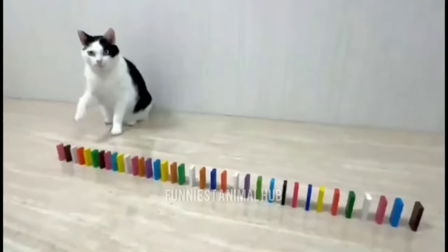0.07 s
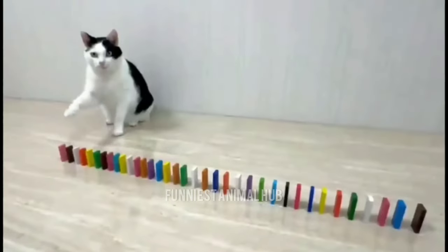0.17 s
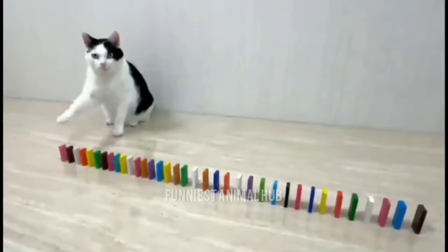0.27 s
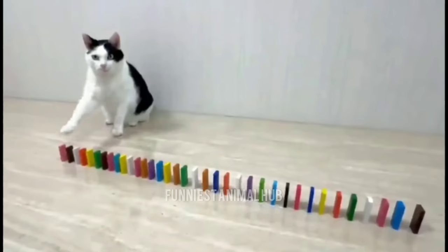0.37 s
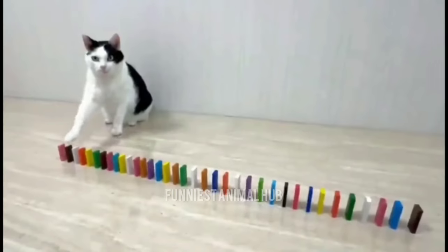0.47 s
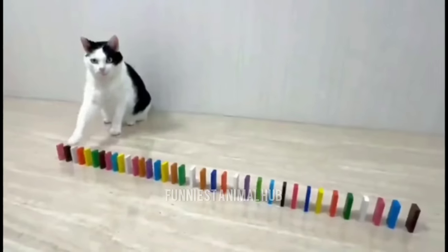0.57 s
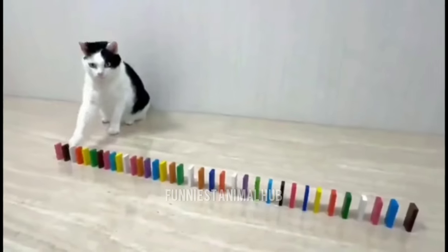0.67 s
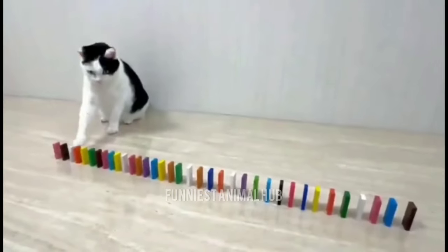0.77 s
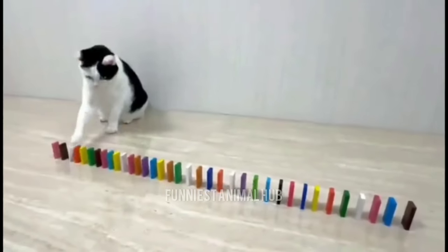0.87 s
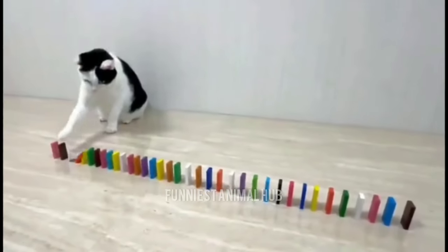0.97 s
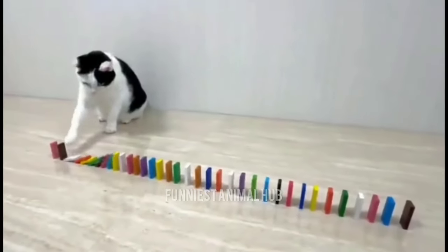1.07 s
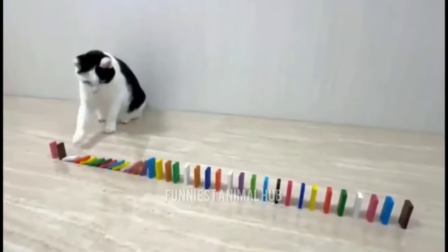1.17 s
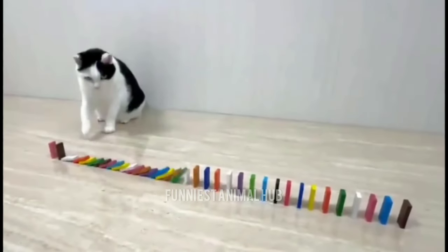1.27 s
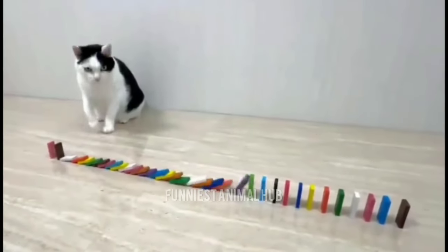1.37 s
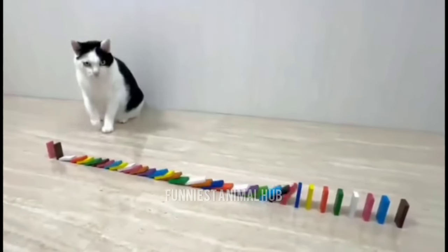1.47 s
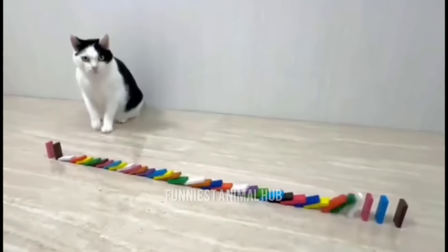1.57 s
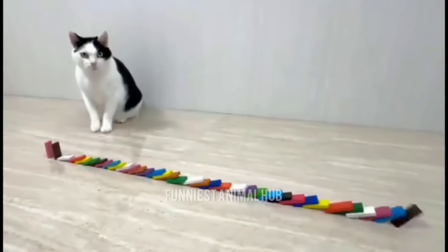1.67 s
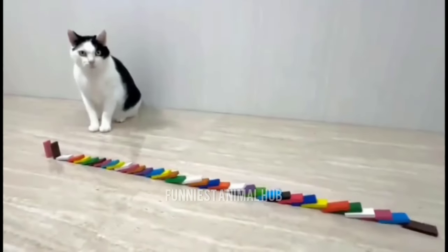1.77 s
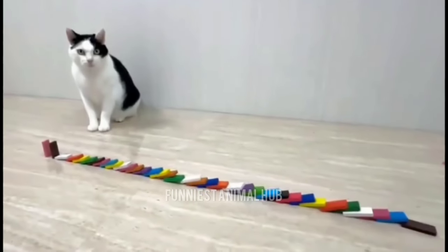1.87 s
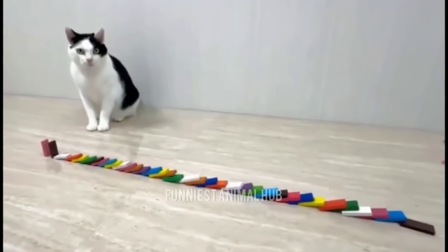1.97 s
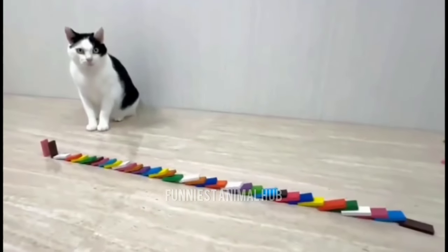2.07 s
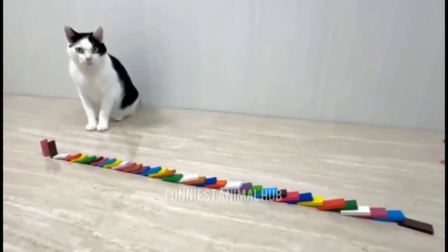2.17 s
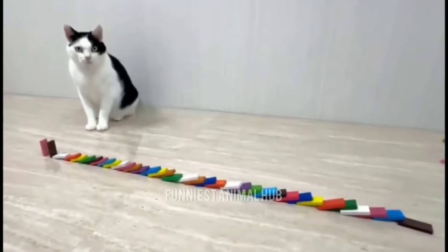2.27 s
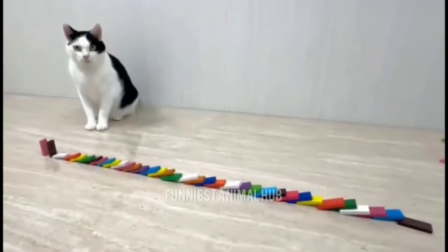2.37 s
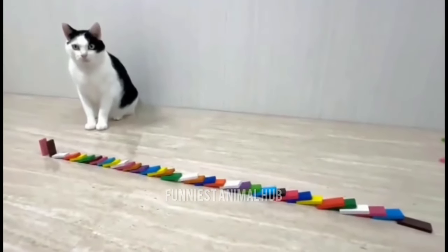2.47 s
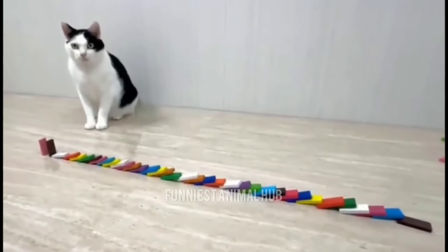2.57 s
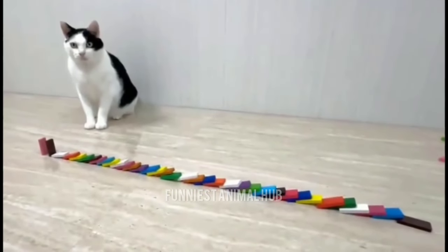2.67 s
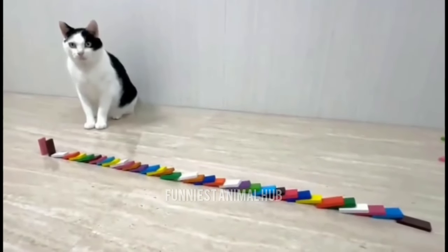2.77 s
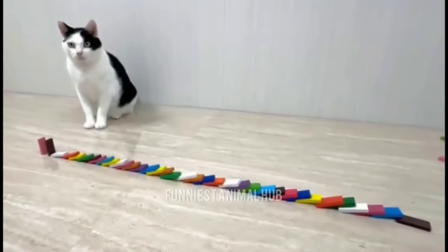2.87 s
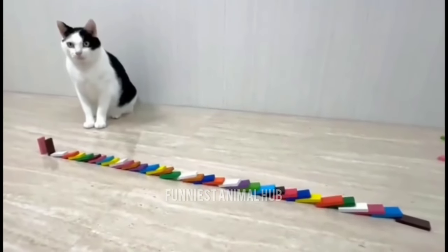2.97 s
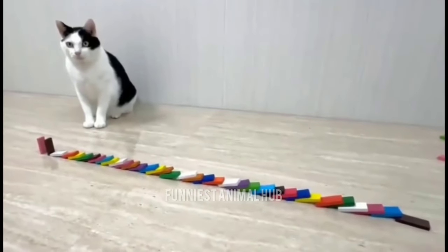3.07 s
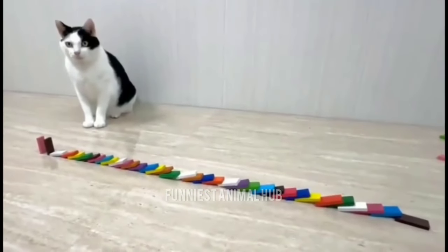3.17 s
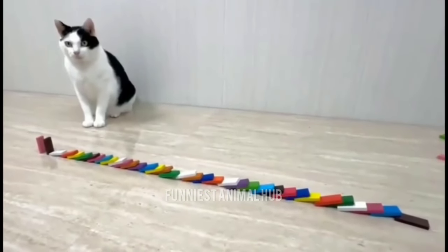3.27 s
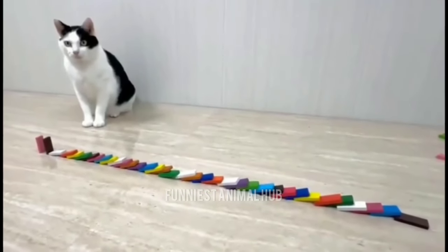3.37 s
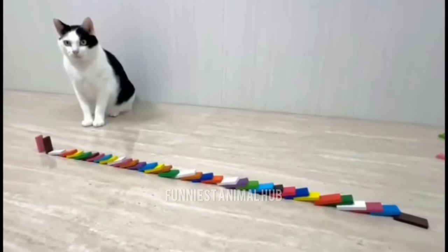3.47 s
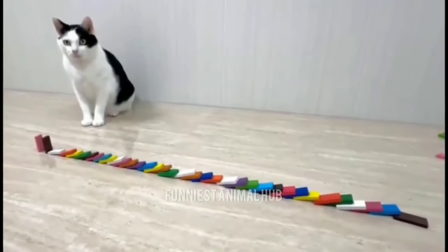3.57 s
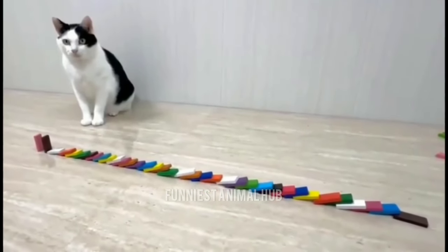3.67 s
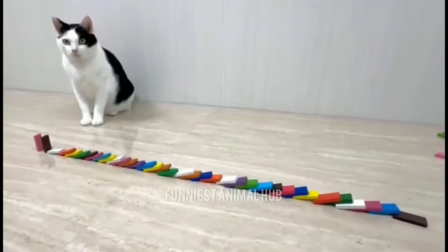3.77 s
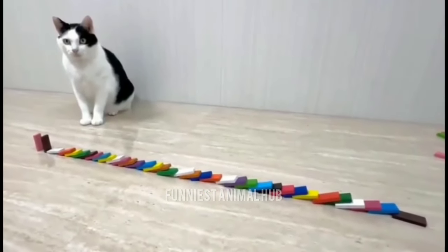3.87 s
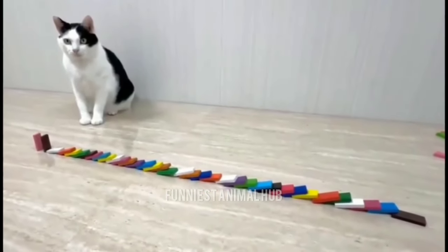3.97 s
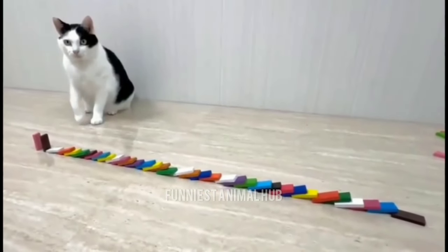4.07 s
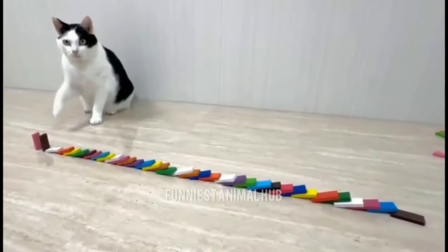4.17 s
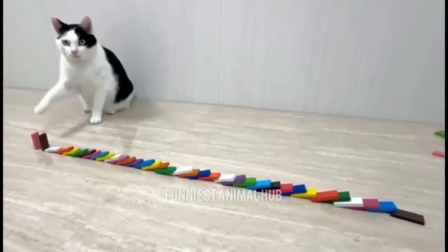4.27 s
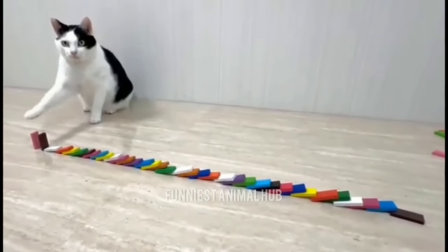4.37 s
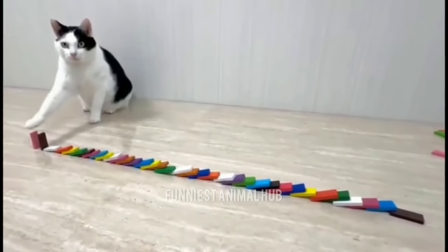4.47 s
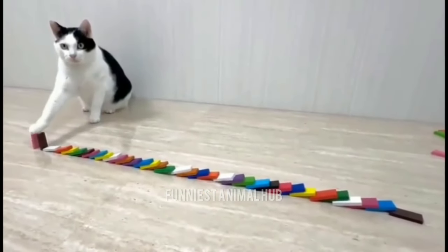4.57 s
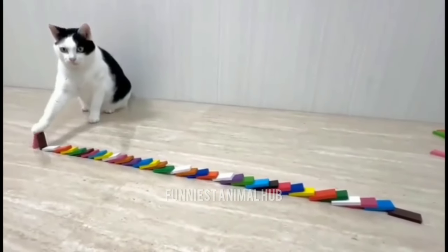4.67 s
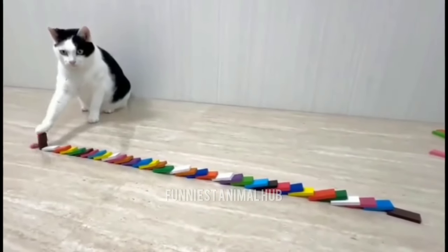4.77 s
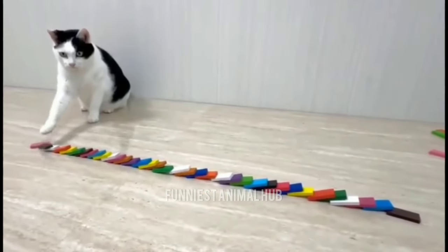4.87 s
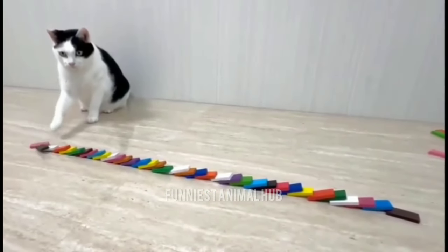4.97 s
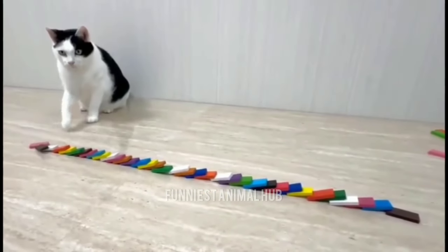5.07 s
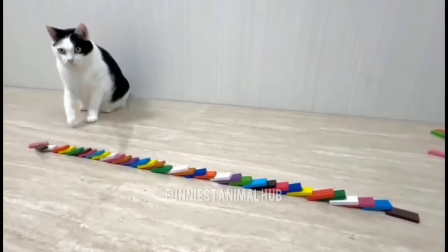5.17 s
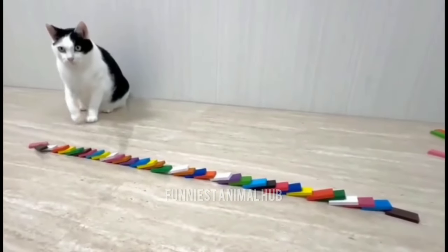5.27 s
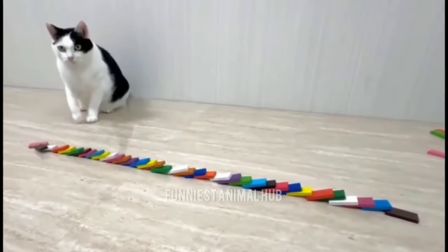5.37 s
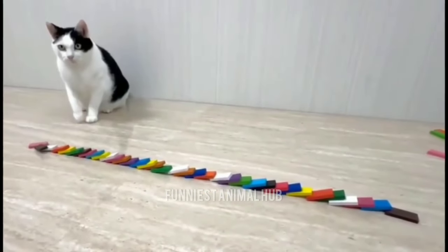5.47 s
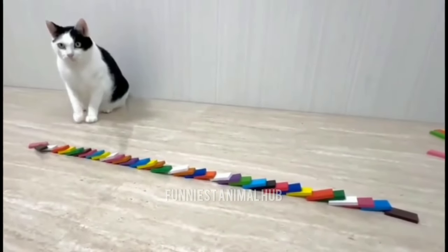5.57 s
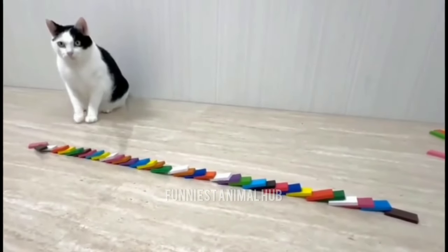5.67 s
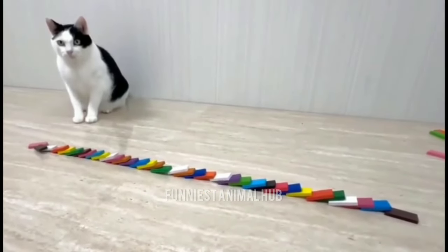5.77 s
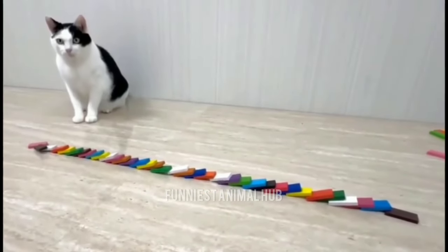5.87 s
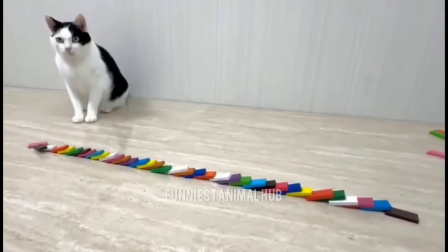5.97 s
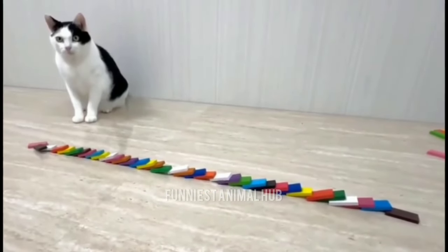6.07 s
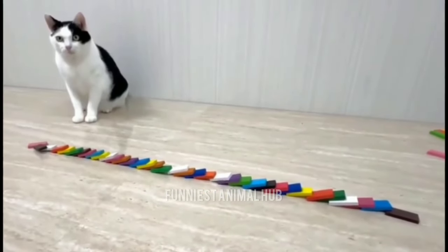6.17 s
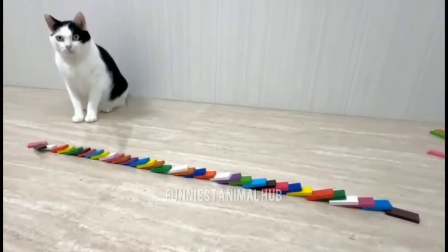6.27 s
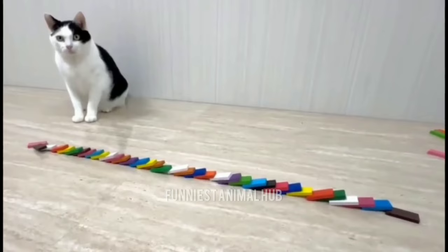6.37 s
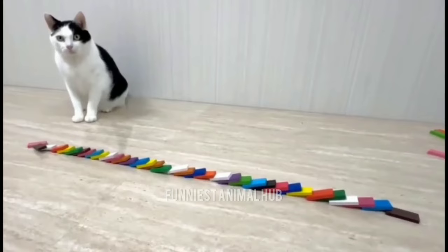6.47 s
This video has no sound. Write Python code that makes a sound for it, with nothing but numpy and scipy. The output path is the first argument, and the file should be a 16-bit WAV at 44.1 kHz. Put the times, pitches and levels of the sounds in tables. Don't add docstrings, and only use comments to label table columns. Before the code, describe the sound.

A long row of small wooden dominoes topples in a rapid clacking rush on a hard floor, then two last blocks clack over later.

```python
import sys
import numpy as np
from scipy import signal
from scipy.fft import rfft, irfft
from scipy.io import wavfile
from scipy.ndimage import uniform_filter1d

SR = 44100
rng = np.random.default_rng(int(sys.argv[2]) if len(sys.argv) > 2 else 0)


def volts_from_db(level):
    exponent = np.asarray(level, float) / 20
    return 10 ** exponent


def master_out(mix):
    frames = np.transpose(np.atleast_2d(mix))
    ceiling = np.clip(frames, -1, 1)
    pcm = np.round(ceiling * 32767).astype(np.int16)
    wavfile.write(sys.argv[1], SR, pcm)


N = 287795
PORT_LAG_S = .0002
LAST_BLOCK_S = 2.043


def along(table, hz):
    at, value = np.transpose(table)
    return np.interp(np.log(np.maximum(hz, 1)), np.log(at), value)


def unit(x):
    return x / np.sqrt(np.mean(x ** 2))


def ring(x, modes):
    out = 0
    for k, (hz, width, db) in enumerate(modes):
        b, a = signal.iirpeak(hz, hz / width, SR)
        out = out + (-1) ** k * volts_from_db(db) * signal.lfilter(b, a, x + 1e-18)
    return out


def place(seconds, grains):
    out = np.zeros(N + 1024)
    np.add.at(out, (seconds[:, None] * SR).astype(int) + np.arange(1024), grains)
    return out[:N]


def blows(seconds, db, contact_s, rise_s=0.00051):
    t = np.arange(1024) / SR
    rough = volts_from_db(db)[:, None] * rng.standard_normal((len(seconds), 1024))
    return place(seconds, rough * (1 - np.exp(-t / rise_s)) * np.exp(-t / contact_s))


def pings(seconds, db, hz, ring_s):
    t = np.arange(1024) / SR
    notes = volts_from_db(db)[:, None] * np.sin(2 * np.pi * hz[:, None] * t)
    return place(seconds, notes * (1 - np.exp(-t / 0.00058)) * np.exp(-t / ring_s))


# (frequency [Hz], width [Hz], level [dB])
BLOCK_MODES = [(1326, 233, 1), (1919, 220, 0), (2586, 412, 0), (3670, 530, 0), (4600, 350, 3),
               (5000, 1070, 1), (6800, 2100, -10)]
BLOCK_SIZES = (.9, .96, 1.03, 1.1)


def wood(push, spread=0.94):
    turn = int(.011 * SR)
    which = np.repeat(rng.integers(0, len(BLOCK_SIZES), N // turn + 1), turn)[:N]
    out = 0
    for k, scale in enumerate(BLOCK_SIZES):
        modes = [(hz * scale, width * spread, db) for hz, width, db in BLOCK_MODES]
        out = out + ring(push * (which == k), modes)
    return out


# (frequency [Hz], width [Hz], level [dB])
CORNER_MODES = [(8910, 2830, 1), (9660, 1400, 4), (11700, 2500, -2)]


def corner(push):
    return ring(push, CORNER_MODES)


# (frequency [Hz], width [Hz], level [dB])
BOARD_MODES = [(152, 39, -18), (335, 46, 2.5), (485, 77, -6.5), (663, 102, -1), (987, 260, -16.5)]


def boards(push):
    return ring(push, BOARD_MODES)


# (frequency [Hz], width [Hz], level [dB])
FLOOR_MODES = [(77.4, 13, 3), (107, 44, -18.5)]


def whole_floor(push):
    return ring(push, FLOOR_MODES)


# (time [s], level [dB], loudest block mode [Hz])
CLACKS = [(1.2112, -28, 3400), (1.2418, -31, 2100), (1.2689, -23, 2700), (1.288, -22.5, 2820),
          (1.297, -15, 2670), (1.3195, -24.5, 2800), (1.4336, -14.5, 3290), (1.5588, -16, 8040),
          (1.6566, -19, 4000), (1.7391, -18.5, 4470), (1.9242, -18, 4800), (1.9712, -21, 5500),
          (2.0404, -16, 3447), (2.1075, -29, 5370), (5.1283, -16.5, 5580), (5.1453, -35, 6140),
          (5.1864, -29, 3650), (5.2078, -15, 3710), (5.2641, -34, 4600), (5.2889, -46.5, 4780),
          (5.8423, -57.5, 6040)]
# (time [s], level [dB], loudest block mode [Hz])
KNOCKS = [(1.33, -43.5, 2470), (1.3484, -28, 4700), (1.3575, -28, 4350), (1.371, -28.5, 3400),
          (1.3872, -26.5, 4500), (1.3978, -23, 5050), (1.4071, -21.5, 2980), (1.445, -28.5, 3520),
          (1.4935, -23.5, 3320), (1.5053, -14, 2530), (1.5298, -25.5, 3600), (1.541, -24.5, 3300),
          (1.565, -41, 6800), (1.5882, -32.5, 8000), (1.61, -21, 8250), (1.6315, -16, 5600),
          (1.6405, -27, 3140), (1.69, -25.5, 4120), (1.711, -26, 6800), (1.761, -22.5, 3430),
          (1.773, -19, 3400), (1.799, -24, 2500), (1.8123, -30, 3530), (1.8255, -34.5, 6840),
          (1.8375, -32, 3330), (1.8574, -32, 3370), (1.879, -17.5, 3310), (1.8889, -31, 2970),
          (1.9008, -23, 6140), (1.949, -23, 5640), (1.9942, -38.5, 5500), (2.008, -21, 3700),
          (2.0742, -30, 5070), (2.0855, -23, 2780), (2.0982, -28, 3320), (2.1251, -25, 6300),
          (2.1382, -36, 4400), (2.1635, -38, 3630), (2.1729, -49, 4150), (2.1873, -46, 3540),
          (5.154, -22, 5810), (5.1715, -30, 3760), (5.2235, -27, 5370), (5.2316, -24, 5300),
          (5.2399, -30.5, 3580), (5.25, -40, 4800), (5.2753, -39.5, 3430), (5.301, -38, 3100),
          (5.31, -32, 4800), (5.3266, -39, 2880), (5.3379, -50, 3600)]
# (time [s], level [dB])
LOAD = [(1.2, -5.5), (1.45, -2), (1.6, 3.5), (1.85, -4.5), (2.1, -3), (5.1, 4), (5.3, -1.5)]


def clacks():
    s, db, hz = np.vstack([CLACKS, KNOCKS]).T
    tick_s, tick_db, _ = np.transpose(FLAT_LANDINGS)
    push = blows(s - .003, db + 3.5, 0.0038, rise_s=0.0052)
    push = push + volts_from_db(-5) * blows(tick_s, tick_db, 0.00053)
    out = volts_from_db(5.0) * wood(push) + volts_from_db(4.0) * corner(push) + pings(s, db - 5.5, hz, 0.0023)
    slap = np.zeros(N)
    slap[(s * SR).astype(int) + 60] = volts_from_db(db - 13 + np.interp(s, *np.transpose(LOAD)))
    slap[int(LAST_BLOCK_S * SR)] = volts_from_db(-27)
    return out + volts_from_db(36.0) * boards(slap) + volts_from_db(22.5) * whole_floor(slap)


# (time [s], level [dB], snap [Hz])
FLAT_LANDINGS = [(1.2676, -23, 2780), (1.2967, -27, 2660), (1.3195, -11, 3350), (1.927, -4, 8350),
                 (2.0403, -7.5, 3570), (2.0442, -2.5, 6500), (5.1256, -19.5, 6200), (5.1284, -9.5, 6200),
                 (5.1315, -5, 4050), (5.1438, -9, 6400), (5.185, -12, 4200), (5.208, -7, 4740),
                 (5.2104, -8, 3700), (5.2648, -8, 4600)]
# (frequency [Hz], width [Hz], level [dB])
SLAP_MODES = [(302, 39, 2), (407, 180, -10.5)]


def landings():
    s, db, hz = np.transpose(FLAT_LANDINGS)
    push = blows(s - .001, db, 0.0019, rise_s=0.0008)
    thump = np.zeros(N)
    thump[int((LAST_BLOCK_S + 0.0015) * SR)] = volts_from_db(23.0)
    crack = volts_from_db(0.5) * (wood(push, spread=1.3) + volts_from_db(-9.0) * corner(push))
    crack = crack + ring(thump, SLAP_MODES) + pings(s, db - 11, hz, 0.0024)
    knock_s, knock_db, knock_hz = np.transpose(KNOCKS)
    crack = crack + pings(knock_s + .001, knock_db + 3, knock_hz, 0.0011)
    return np.array([np.roll(crack, int(PORT_LAG_S * SR)), crack])


# (time [s], level [dB], note [Hz], left
# minus right [dB])
CHIPS = [(1.2113, -26, 8170, 4), (1.2405, -39, 3080, 4), (1.2692, -21, 2630, 4), (1.2967, -15, 2630, 2),
         (1.3206, -13, 2780, 1), (1.3329, -23, 3270, 4), (1.3409, -27, 3440, 1), (1.3794, -16, 2120, -2),
         (1.3894, -20, 4440, 2), (1.3996, -18, 5000, 4), (1.4301, -14, 4850, 3), (1.4537, -18, 3530, 1),
         (1.4715, -27, 3730, 5), (1.4879, -13, 3380, 0), (1.5072, -18, 3670, -1), (1.5226, -22, 3630, 0),
         (1.5303, -16, 3450, 0.5), (1.5425, -18, 6590, -3.5), (1.5596, -16, 8270, -0.5),
         (1.5836, -19, 3600, -1), (1.6144, -12, 5600, -5), (1.633, -14, 6100, 21), (1.6418, -12, 3200, 0),
         (1.6575, -13, 3970, -8), (1.6878, -17, 9350, -9), (1.7276, -14, 3350, -3), (1.7404, -25, 4060, 3),
         (1.7625, -17, 3360, -5), (1.8074, -14.5, 2470, 6), (1.821, -23, 2240, 4), (1.8442, -23, 3400, 5),
         (1.8588, -32, 3340, 3), (1.8747, -21.5, 4860, 4), (1.8901, -30, 2680, -4), (1.8977, -18, 3815, 0),
         (1.9263, -13.5, 9400, -2), (1.942, -17, 4620, 7), (1.9499, -17, 4520, 5),
         (1.9718, -18, 5600, 11.5), (2.0226, -23, 3800, 8.5), (2.0414, -5, 3440, -1),
         (2.0609, -17, 4800, 15), (2.0744, -17, 4870, 2), (2.0878, -19, 2870, 3), (2.1083, -12.5, 5670, 10),
         (2.1233, -22, 3080, -9), (2.1425, -29, 3570, -2), (2.1809, -32, 3790, -1),
         (5.1195, -39, 4090, 2), (5.1285, -18, 5540, 1), (5.1454, -13, 5860, 7), (5.159, -19, 4910, 9),
              (5.173, -22, 3550, 2), (5.1858, -14, 3790, 1), (5.1981, -32, 3010, -2),
              (5.2094, -15, 3630, 17), (5.2244, -9.5, 5350, 4), (5.2331, -20, 5940, 6),
              (5.2412, -15.5, 3620, 2), (5.2642, -19, 3660, 5), (5.2886, -24, 3500, -1),
              (5.3033, -22, 2860, 4), (5.315, -31, 3320, 3), (5.3269, -29, 2760, 1), (5.3393, -24, 2600, 0),
              (5.3566, -37, 3780, 0)]


def chips():
    s, db, hz, pan_db = np.array(CHIPS).T
    out = []
    for side, lag_s in ((.5, PORT_LAG_S), (-.5, 0.0011)):
        heard_db = db + side * pan_db
        snap = blows(s + lag_s, heard_db - 9.5, 0.00058, rise_s=0.0002)
        note = pings(s + lag_s, heard_db + 5.0, hz, 0.00071)
        out.append(wood(snap, spread=2.5) + volts_from_db(-1.0) * corner(snap) + note)
    return np.array(out)


# (time [s], level [dB], weight on the floor [dB], sharpness [dB])
RATTLE = [
    [(1.209, -36, -4, -13), (1.26, -39.5, -6.5, -14.5), (1.303, -29.5, -6, -3.5), (1.43, -25.5, -3, -6),
     (1.5, -31, -1.5, 3.5), (1.58, -26.5, -5, 5.5), (1.7, -28.5, -4.5, 4.5), (1.84, -29.5, -1, -3.5),
     (1.93, -31.5, -3.5, 10.5), (2.04, -28, -3.5, -16), (2.13, -32, -7, -8.5)],
    [(5.116, -34, -12, -16), (5.128, -32, -20, 2), (5.205, -24.5, -10.5, -13.5), (5.259, -35.5, -1, -14),
     (5.31, -44.5, -16, -10)],
]


def rattle():
    knocks_per_s = 600
    out = np.zeros(N)
    for rows in RATTLE:
        at, db, thud_db, sharp_db = np.transpose(rows)
        lasts_s = at[-1] - at[0]
        chance = rng.random((int(lasts_s * knocks_per_s), 3))
        s = at[0] + lasts_s * chance[:, 0]
        size_db = np.interp(s, at, db) + np.minimum(-3.0 * np.log(1 - chance[:, 1]), 4.5)
        weight_db = np.interp(s, at, thud_db)
        out += volts_from_db(-1.5) * wood(blows(s, size_db, 0.0025))
        out += pings(s, size_db - 8.5, 2300 * 3.0 ** chance[:, 2], 0.0041)
        out += volts_from_db(-1.5) * corner(blows(s, size_db + np.interp(s, at, sharp_db), 0.0015))
        out += volts_from_db(12.0) * boards(blows(s, size_db + weight_db, 0.0015))
        out += volts_from_db(25.5) * whole_floor(blows(s, size_db + weight_db / 2 - 15.5, 0.0011))
    return out


# (time [s], level [dB])
NUDGES = [
    (1.2, -38),
    (1.205, -42.5),
    (5.0125, -51),
    (5.0382, -31.5),
    (5.0507, -37),
    (5.071, -37),
    (5.08, -30),
    (5.095, -35.5),
    (5.113, -36),
    (5.121, -36),
]


def nudges():
    push = blows(*np.transpose(NUDGES), 0.0023, rise_s=0.00087)
    padded = uniform_filter1d(uniform_filter1d(push, size=4), size=4)
    body = volts_from_db(-5.0) * ring(push, [(1200, 1500, 0.00042)])
    return body + volts_from_db(8.0) * wood(padded, spread=1.2) + volts_from_db(0.5) * boards(push)


# (frequency [Hz], likeness [0-1])
LIKENESS = [(100, 0.99), (280, 0.89), (620, 0.15), (1300, 0.11), (14000, 0)]


def stereo_noise(size, gain):
    hz = np.fft.rfftfreq(size, 1 / SR)
    like = np.clip(along(LIKENESS, hz), 0, 1)
    mid, side = rfft(rng.standard_normal((2, size)))
    pair = np.sqrt(1 + like) * mid + np.sqrt(1 - like) * side * np.array([[1], [-1]])
    return irfft(gain(hz) * pair, size)


# (frequency [Hz], time to fall 60 dB [s])
ROOM_T60 = [(100, 0.76), (300, 0.4), (1000, 0.51), (3000, 0.52), (6000, 0.51), (12000, 0.4)]
# (frequency [Hz], left minus right [dB])
ROOM_LEFT = [(60, -9), (110, -6), (200, 11), (370, -2), (680, 3.5), (1240, -1), (2270, 0), (4150, 1.5),
             (7610, -0.5), (13900, -3)]


def echo_noise(size):
    t, tail = np.arange(size) / SR, 0
    side = np.array([[.5], [-.5]])
    for hz in 60 * 2. ** np.arange(9):
        def octave_gain(f):
            away = np.clip(np.log2(np.maximum(f, 1) / hz), -1, 1)
            return np.cos(np.pi / 2 * away) ** 2 * volts_from_db(side * along(ROOM_LEFT, f))
        tail = tail + stereo_noise(size, octave_gain) * volts_from_db(-60 * t / along(ROOM_T60, hz))
    return t, tail


def room(x):
    out, size, step = np.zeros((2, N + 2 ** 16)), 24576, 4096
    for i in range(0, N, step):
        if abs(x[i:i + step]).max() < 1e-6:
            continue
        t, tail = echo_noise(size)
        early = tail * np.exp(-t / 0.0035)
        late = tail * np.clip((t - .005) / 0.0058, 0, 1)
        echo = (volts_from_db(-1.5) * unit(early) + volts_from_db(4.0) * unit(late)) / np.sqrt(size)
        echo[0, int(PORT_LAG_S * SR)] += 1
        echo[1, 0] += 1
        wet = signal.fftconvolve(x[None, i:i + step], echo, axes=1)
        out[:, i:i + wet.shape[1]] += wet
    return out[:, :N]


# (frequency [Hz], level per Hz [dB])
AIR = [(15, -58.5), (25, -35), (91, -7), (123, -9.5), (166, -7.5), (199, -2), (225, -12), (329, -14),
       (574, -19), (721, -12), (976, -17.5), (1260, -18.5), (3280, -46), (5720, -32), (10500, -54.5),
       (13600, -98.5), (22000, -120)]
# (frequency [Hz], left minus right [dB])
AIR_LEFT = [(60, -13.5), (110, 5), (200, 4), (370, 4), (680, 7), (1240, 1), (2270, 3), (4150, 9.5),
            (7610, 14), (13900, -54)]
# (frequency [Hz], width [Hz], level [dB])
HUM = [(53, 10, -68), (73.4, 26, -61.5), (100.75, 3.2, -60.5), (150.5, 6.1, -66.5), (197.65, 10.7, -56.5),
       (683, 66, -68), (1274, 75, -74)]


def air():
    side = np.array([[.5], [-.5]])
    hiss = unit(stereo_noise(N, lambda f: volts_from_db(along(AIR, f) + side * along(AIR_LEFT, f)))) * volts_from_db(-55)
    noise = stereo_noise(N, np.ones_like)
    hum = 0
    for hz, width, db in HUM:
        line = [(hz, width, 0)]
        hum = hum + volts_from_db(db) * unit(ring(ring(noise, line), line))
    draught_db = -68 + 8 * np.exp(-(np.arange(N) / SR / 0.58) ** 2)
    draught = volts_from_db(draught_db) * unit(ring(noise[::-1, ::-1], [(1830, 840, 0)]))
    return hiss + hum + draught


def scene():
    blocks = room(clacks() + rattle() + nudges()) + landings() + chips()
    no_rumble = signal.butter(2, 43, "high", fs=SR, output="sos")
    return air() + signal.sosfilt(no_rumble, blocks)


def weak_bands(power, hz):
    band, frame = np.ix_(np.arange(len(hz)) // 3, np.arange(power.shape[1]) // 6)
    smooth = uniform_filter1d(uniform_filter1d(power, size=6, axis=1), size=3, axis=0)
    level_db = 10 * np.log10(smooth + 1e-18)
    under_db = level_db - uniform_filter1d(level_db, size=60, axis=0)
    luck_db = 1.8 * rng.standard_normal(power.shape)
    seam = np.flatnonzero((hz > 7300) & (hz < 7950))
    luck_db[seam[0] // 3 + 1:seam[-1] // 3] += 2.2
    middle = np.minimum(3 * band + 1, len(hz) - 1)
    weak = under_db[middle, 6 * frame] < -3.0 + luck_db[band, frame]
    prone = ((hz > 1500) & (hz < 4700)) | ((hz > 6900) & (hz < 7900))
    return weak & prone[:, None]


# (start [s], end [s])
CLATTER_S = [
    (1.17, 2.45),
    (4.99, 5.55),
]
# (start [s], end [s], edge [Hz])
OPEN_TREBLE = [
    (1.84, 1.95, 14000),
    (1.95, 2.0, 13400),
    (2.0, 2.06, 14500),
    (2.095, 2.25, 12000),
    (2.25, 2.34, 11700),
    (5.125, 5.146, 12000),
]
OPEN_TREBLE_DB = [-10, -9, -12, -4.5, -7, -16.5]
# (start [s], end [s], low [Hz], high [Hz])
SCRAPS = [(1.205, 1.22, 12900, 14300), (1.24, 1.31, 11400, 12500), (1.26, 1.32, 10500, 11200),
          (1.315, 1.42, 12000, 13300), (1.47, 1.6, 12000, 13000), (1.54, 1.575, 13000, 14300),
          (1.68, 1.75, 12000, 13400), (1.75, 1.84, 11900, 12900), (2.06, 2.09, 12100, 14500),
          (2.17, 2.27, 12600, 13000), (2.38, 2.45, 11500, 11900), (5.055, 5.1, 12050, 12400)]
SCRAP_DB = [-18.5, -31, -17, -16, -16, -16, -16, -15, -19.5, -14, -10, -3]
# (frequency [Hz], width [Hz], level [dB])
NOTCHES = [(5250, 70, -14), (7450, 250, -5)]
# (start [s], end [s], low [Hz], high [Hz])
HOLES = [(1.44, 1.51, 6950, 7550), (1.585, 1.68, 7150, 7550), (1.62, 1.68, 2150, 2500),
         (1.36, 1.39, 1050, 1250), (1.715, 1.745, 2150, 2500), (1.81, 1.86, 2100, 2280),
         (1.9, 1.95, 2150, 2300), (1.93, 2.0, 2950, 3100), (1.95, 2.0, 7150, 7550),
         (1.975, 2.03, 1850, 2100), (2.065, 2.1, 7050, 7600), (2.11, 2.15, 2350, 2500),
         (1.55, 1.6, 1800, 1900), (1.55, 1.6, 2650, 2780), (5.083, 5.11, 6500, 7500),
         (5.155, 5.27, 7150, 7550), (5.225, 5.27, 2950, 3200), (5.25, 5.31, 2100, 2280),
         (5.34, 5.37, 3900, 4050), (2.07, 2.24, 10450, 10700), (1.49, 1.55, 5150, 5350),
         (1.88, 1.9, 1650, 1750), (1.68, 1.72, 2450, 2480), (1.75, 1.81, 2040, 2070),
         (2.04, 2.065, 1740, 1820), (1.57, 1.61, 1540, 1550), (1.96, 1.99, 1570, 1580),
         (1.92, 1.94, 1520, 1540), (2.09, 2.11, 2200, 2240), (1.7, 1.75, 3700, 3720),
         (5.41, 5.48, 1500, 1520), (5.21, 5.24, 1580, 1700)]


def heard_share(z, hz, s):
    def box(lo_hz, hi_hz, start, end):
        return np.outer((hz >= lo_hz) & (hz < hi_hz), (s >= start) & (s <= end))

    top_hz = 10350
    still = ~np.any([(s > start) & (s < end) for start, end in CLATTER_S], axis=0)
    wander = rng.standard_normal((len(hz), len(s)))
    wander = wander[np.ix_(np.arange(len(hz)) // 4, np.arange(len(s)) // 4)]
    keep = 1. * (hz[:, None] < top_hz + still * 330 * (wander - .5))
    for (start, end, edge_hz), db in zip(OPEN_TREBLE, OPEN_TREBLE_DB):
        keep[box(top_hz, edge_hz, start, end)] = volts_from_db(db)
    for (start, end, lo_hz, hi_hz), db in zip(SCRAPS, SCRAP_DB):
        keep[box(lo_hz, hi_hz, start, end)] = volts_from_db(db)
    keep[(wander < -.7) & (hz[:, None] > top_hz)] *= .05
    keep[box(6950, 8650, 2.085, 2.3)] = .003
    for notch_hz, width, db in NOTCHES:
        keep *= volts_from_db(db * np.exp(-((hz - notch_hz) / width) ** 2))[:, None]
    keep[weak_bands(abs(z.sum(axis=0) * keep) ** 2, hz) & still] *= .02
    for start, end, lo_hz, hi_hz in HOLES:
        keep[box(lo_hz - 75, hi_hz + 75, start - .01, end + .01)] *= .003
    for start, end, band in WHISTLES:
        tone_hz = whistle_hz(band)
        keep[box(tone_hz - 400, tone_hz + 400, start, end)] *= .07
    return keep


def whistle_hz(band):
    return (band - .25) * SR / 64


# (start [s], end [s], band [number])
WHISTLES = [(1.25, 1.5, 15), (1.52, 1.85, 15), (1.52, 1.83, 16), (1.4, 1.74, 17), (1.91, 2.01, 17),
            (1.25, 1.47, 20), (1.91, 1.95, 20), (5.14, 5.31, 16), (5.18, 5.37, 17), (5.16, 5.42, 18.5)]
WHISTLE_DB = [-9.5, -1, -15.5, -14, -4.5, -20.5, 0, -6.5, -16, -16]


def whistles(dry):
    t, tones = np.arange(N) / SR, np.zeros((2, N))
    for (start, end, band), db in zip(WHISTLES, WHISTLE_DB):
        tone_hz = whistle_hz(band)
        power = ring(dry, [(tone_hz, 150., 9)]) ** 2
        treble = np.sqrt(uniform_filter1d(power, size=350, axis=1) + 1e-18)
        gate = np.clip(np.minimum(t - start, end - t) / 0.031, 0, 1)
        steps = np.repeat(rng.standard_normal(N // 1024 + 1), 1024)[:N]
        flicker_db = 4 * uniform_filter1d(steps, size=512)
        tones += volts_from_db(db + flicker_db) * gate * treble * np.sin(2 * np.pi * tone_hz * t)
    return tones


def splinter(dry):
    t = np.arange(N) / SR
    treble = signal.sosfilt(signal.butter(6, 12000, "high", fs=SR, output="sos"), dry)
    return volts_from_db(-8) * treble * np.clip(np.minimum(t - 5.1245, 5.131 - t) / .001, 0, 1)


def band_limit(x):
    return signal.sosfilt(signal.butter(12, 16500, fs=SR, output="sos"), x)


def record(dry):
    hz, s, z = signal.stft(dry, SR, nperseg=1024)
    keep = heard_share(z, hz, s)
    power = uniform_filter1d(abs(z) ** 2, size=4, axis=2) + 1e-18
    over_neighbours = power / uniform_filter1d(power, size=15, axis=1)
    z = z * np.where(hz[:, None] > 900, over_neighbours, 1) ** .33
    out = signal.istft(z * keep, SR, nperseg=1024)[1][:, :N] + whistles(dry) + splinter(dry)
    fade = np.clip((np.arange(N) / SR - 0.07) / 0.036, 0, 1) ** 3
    return band_limit(out * fade)


dry = scene()
out = record(dry)
master_out(out)
```